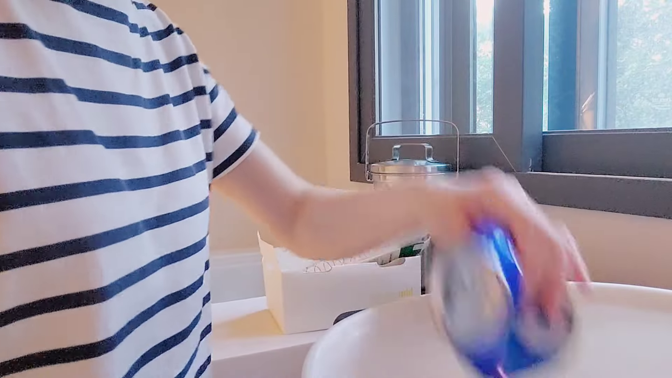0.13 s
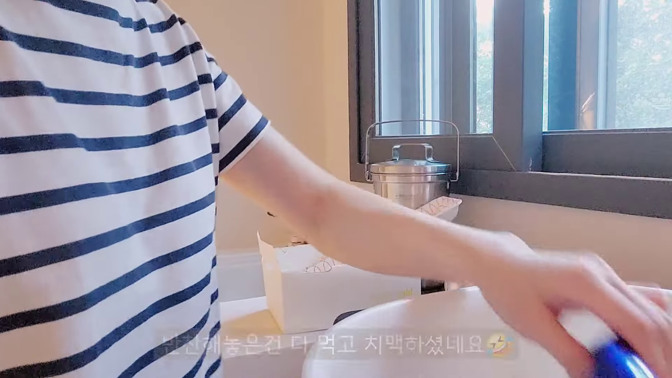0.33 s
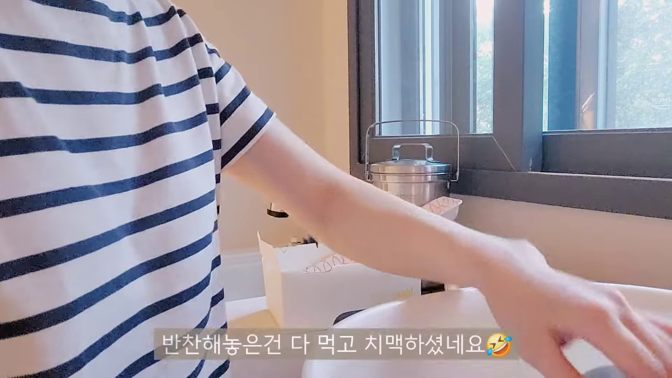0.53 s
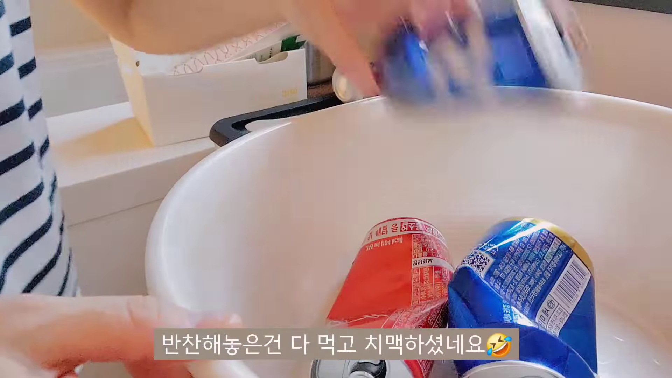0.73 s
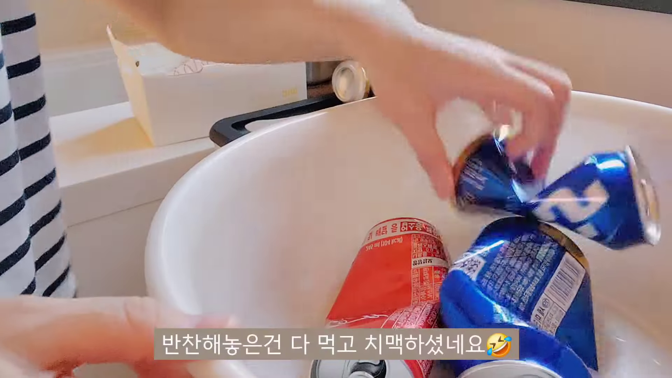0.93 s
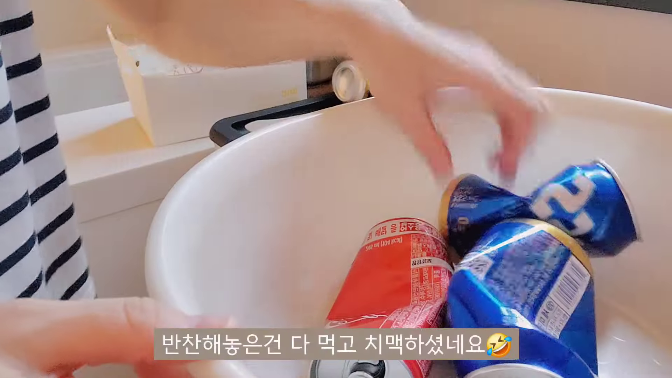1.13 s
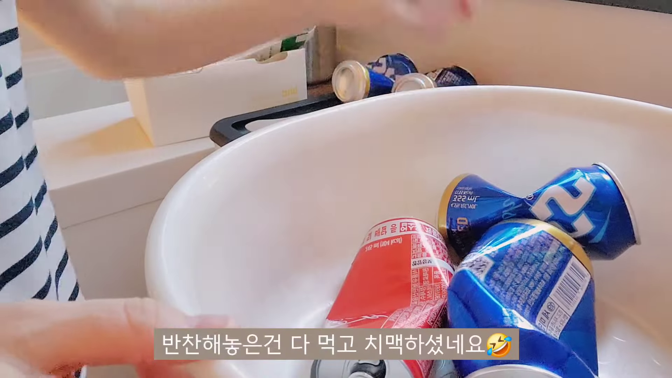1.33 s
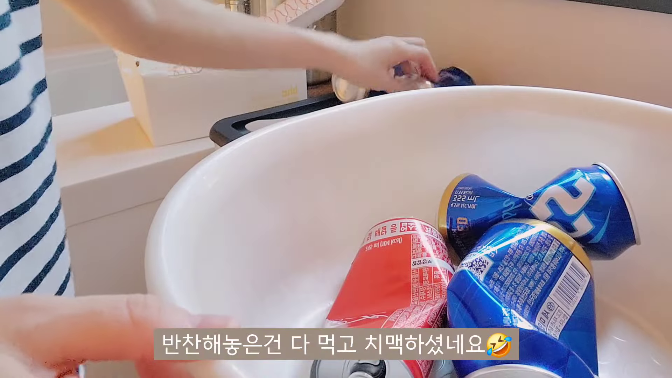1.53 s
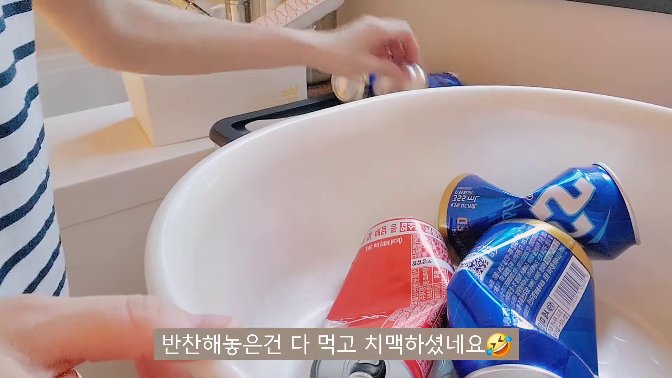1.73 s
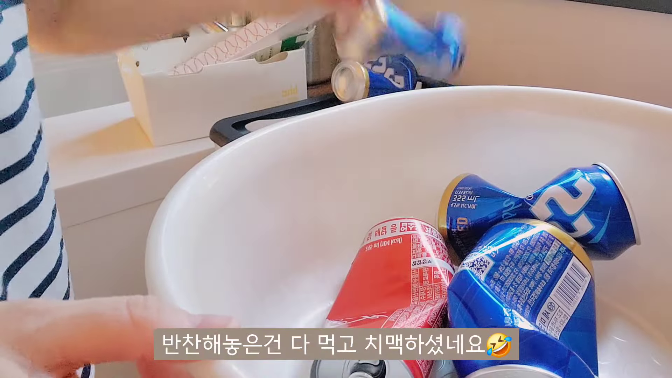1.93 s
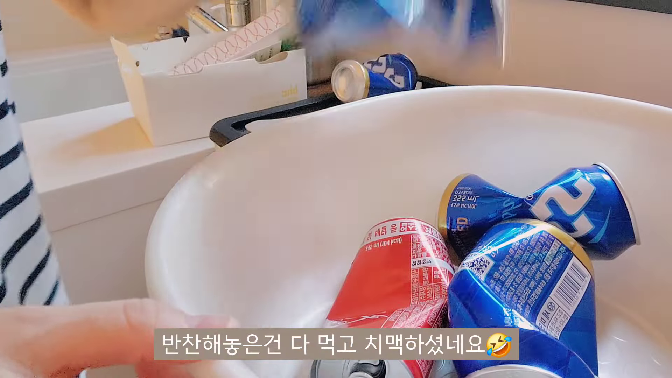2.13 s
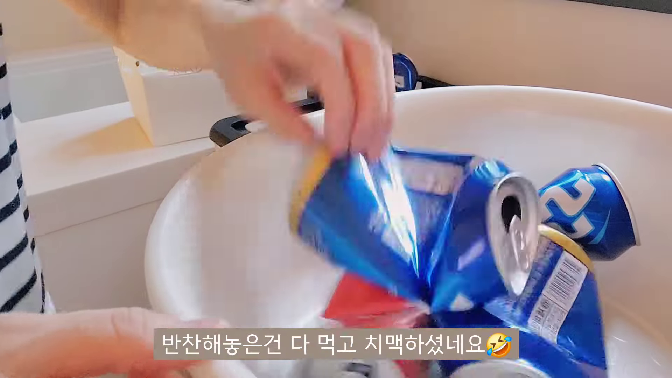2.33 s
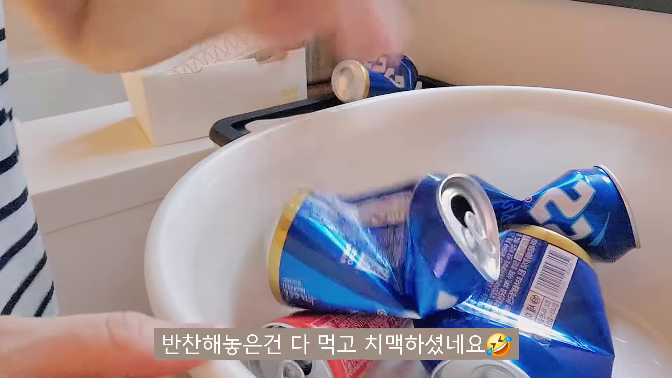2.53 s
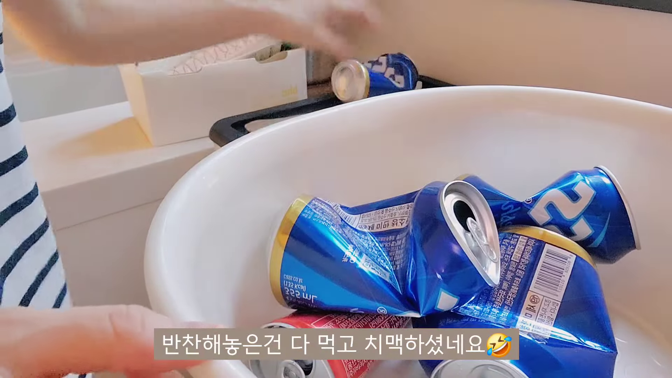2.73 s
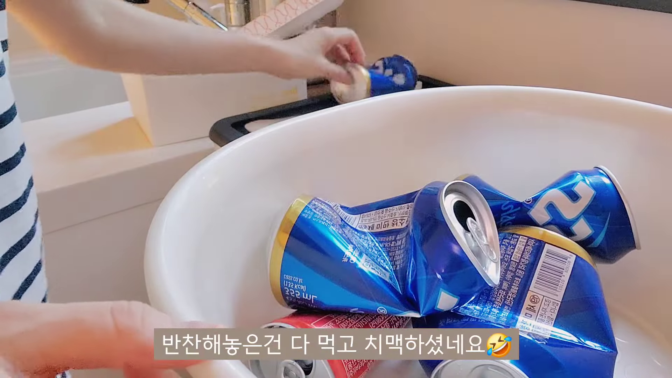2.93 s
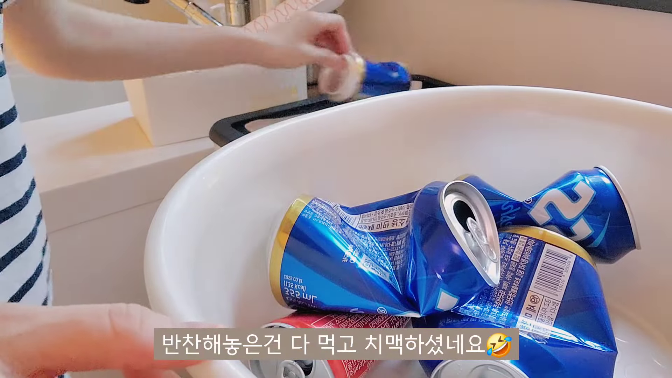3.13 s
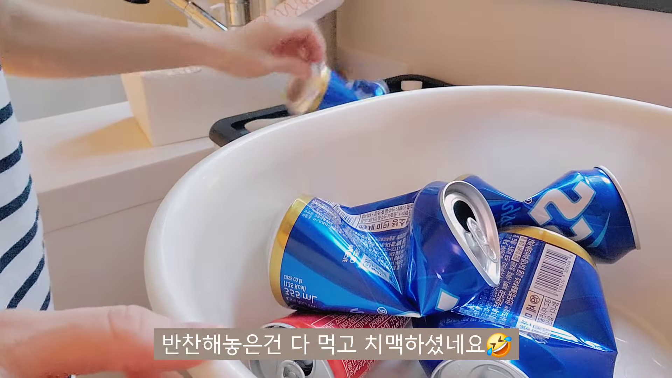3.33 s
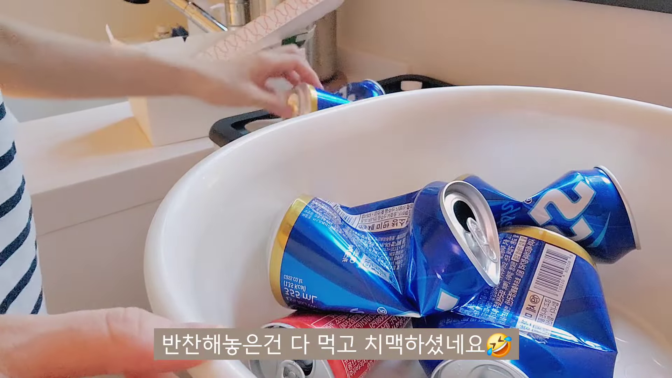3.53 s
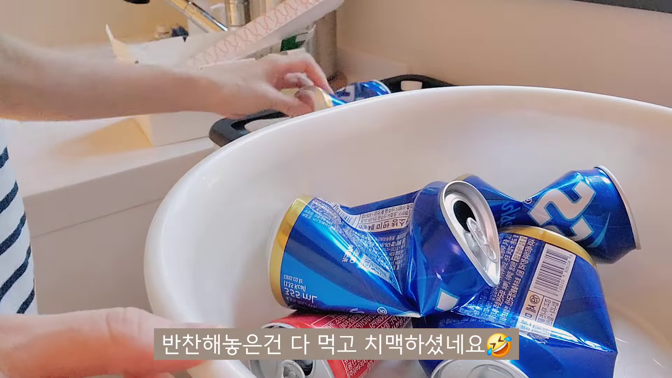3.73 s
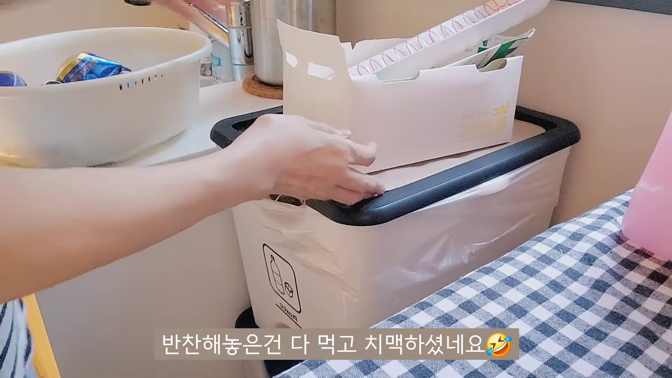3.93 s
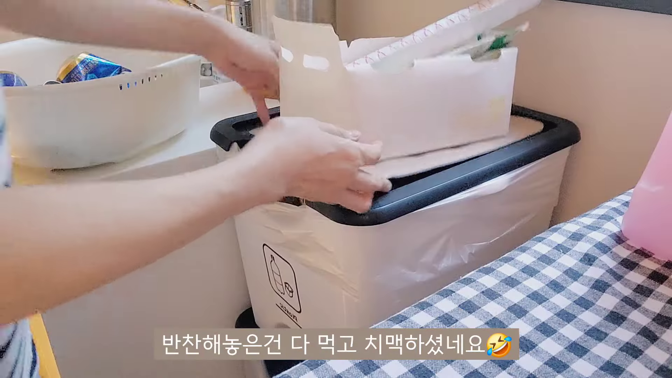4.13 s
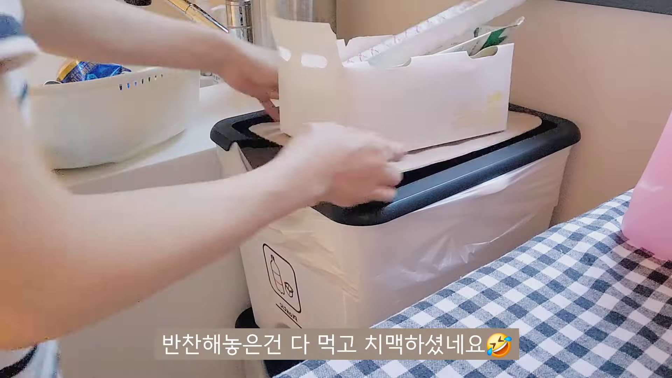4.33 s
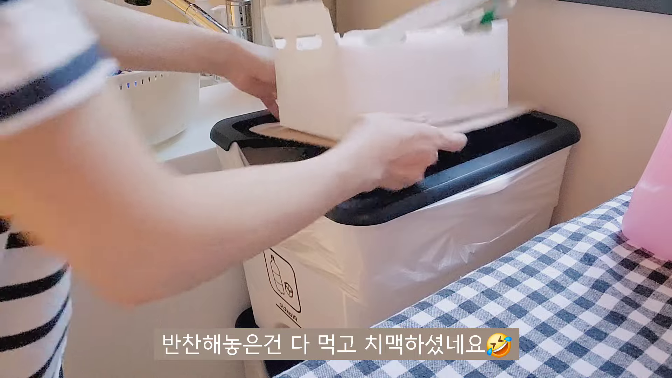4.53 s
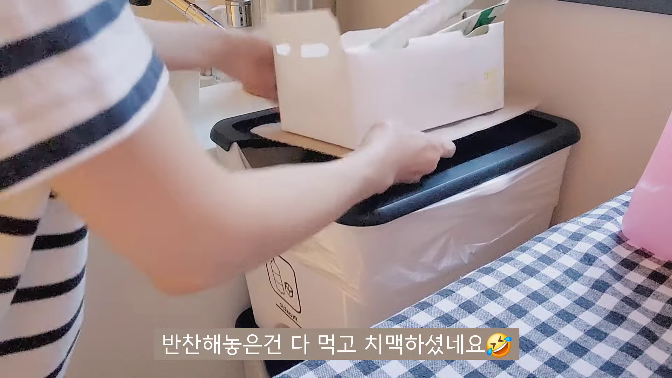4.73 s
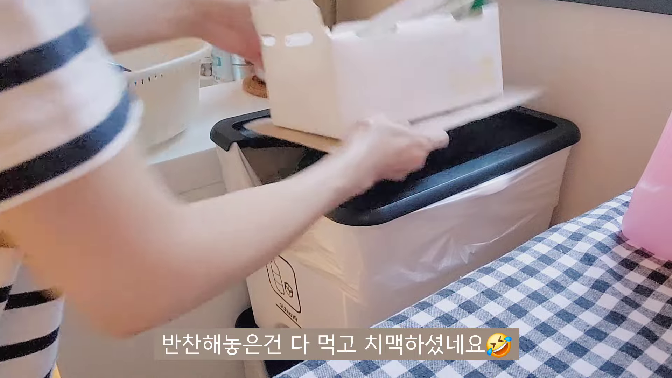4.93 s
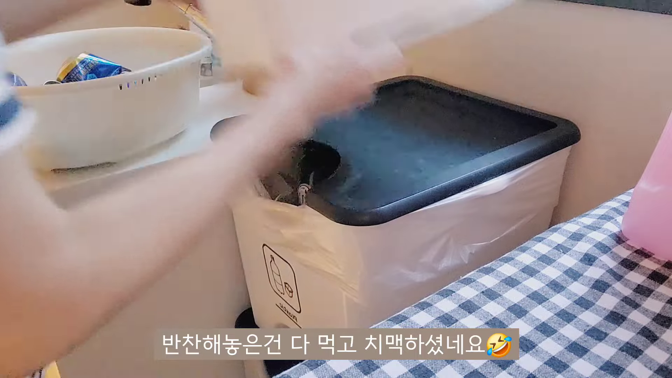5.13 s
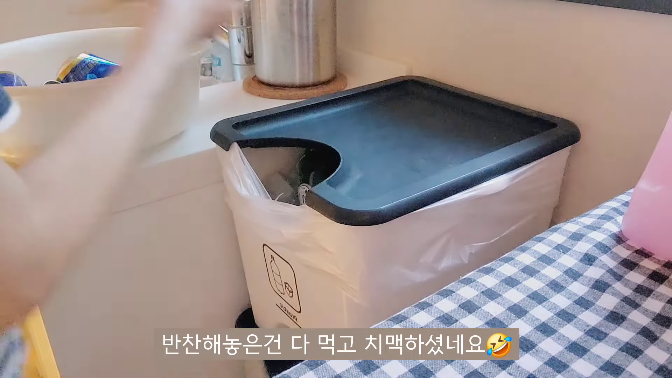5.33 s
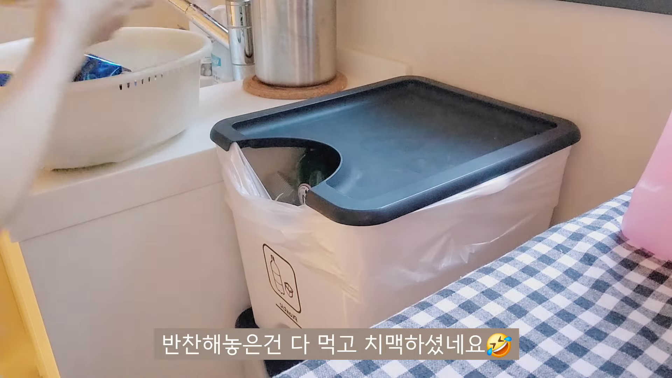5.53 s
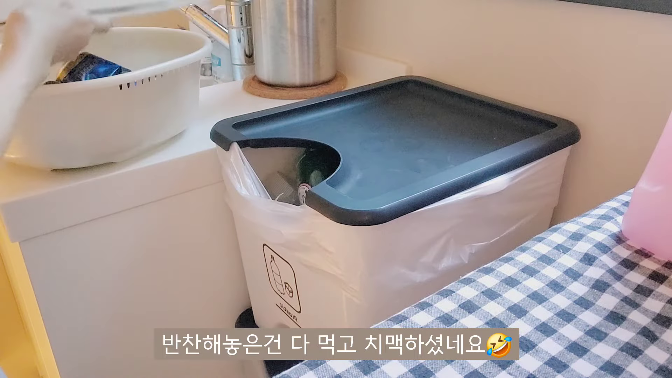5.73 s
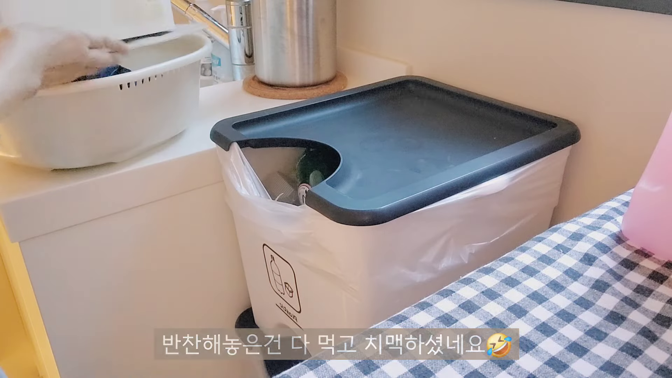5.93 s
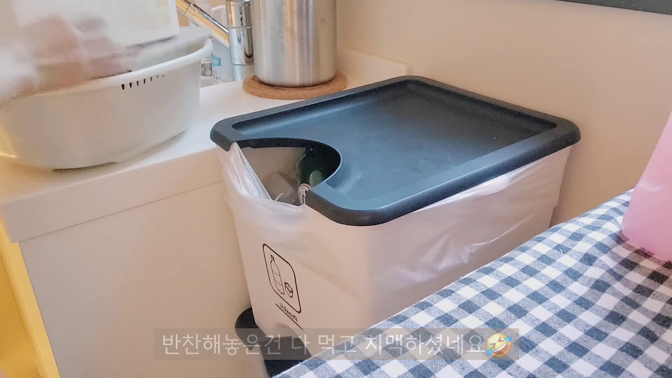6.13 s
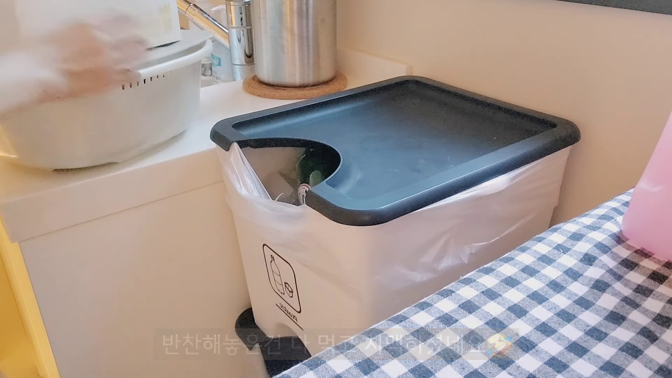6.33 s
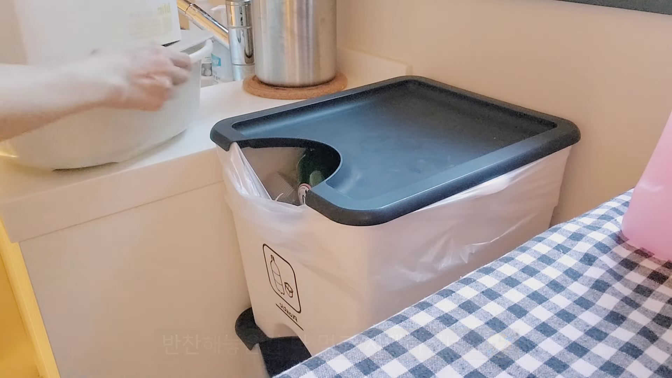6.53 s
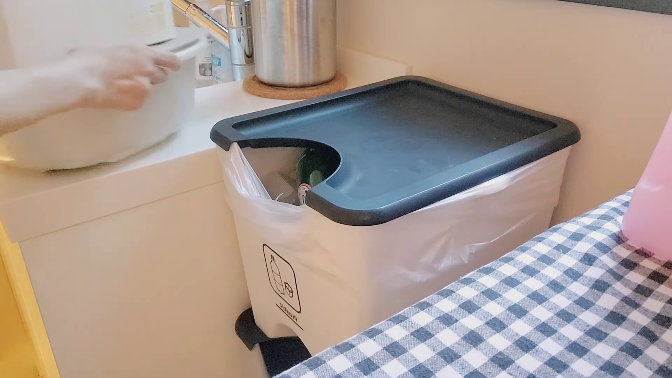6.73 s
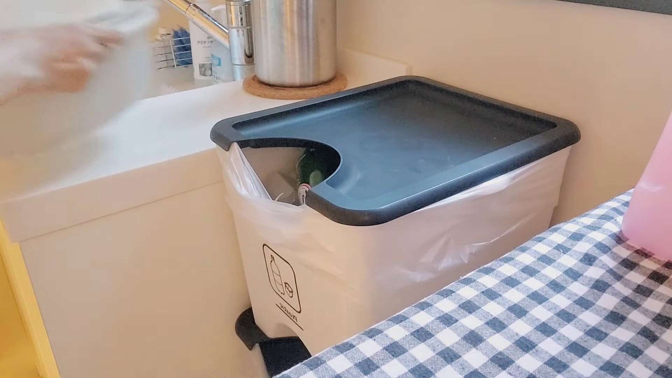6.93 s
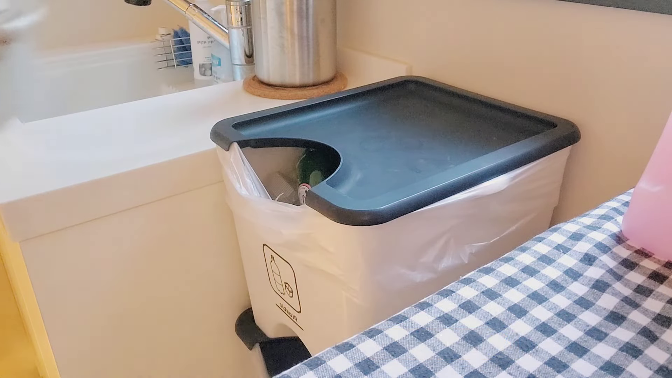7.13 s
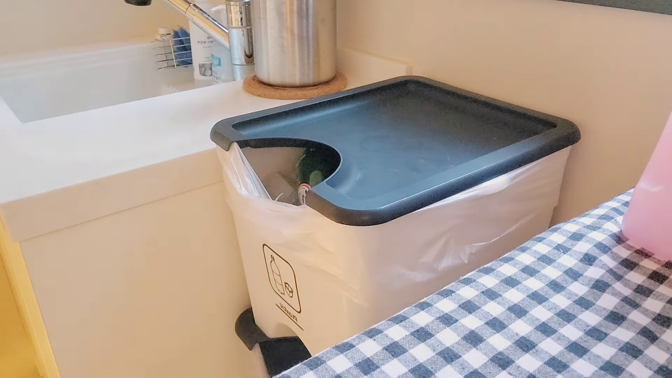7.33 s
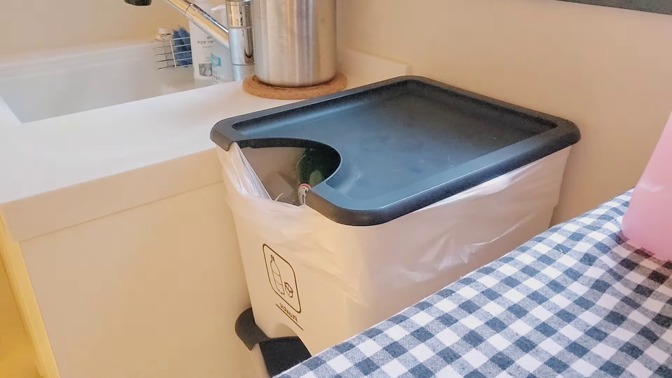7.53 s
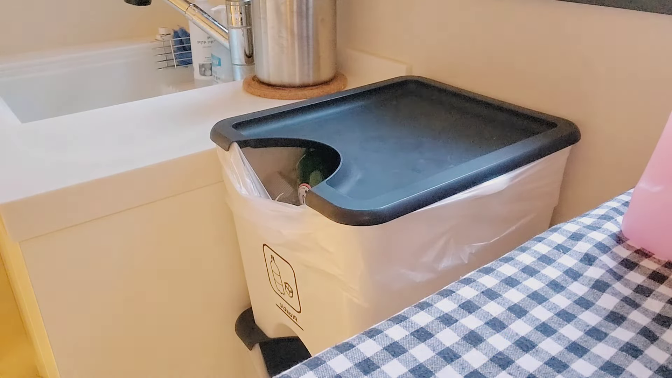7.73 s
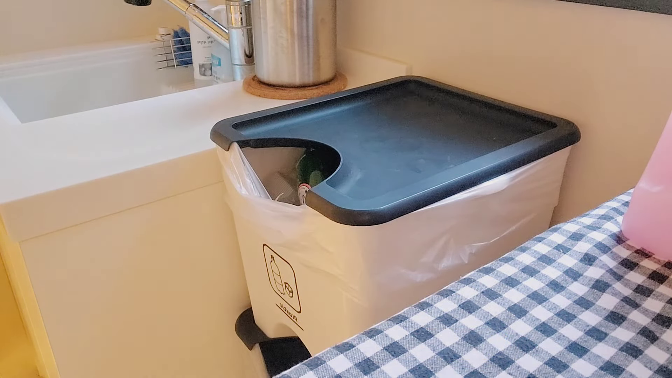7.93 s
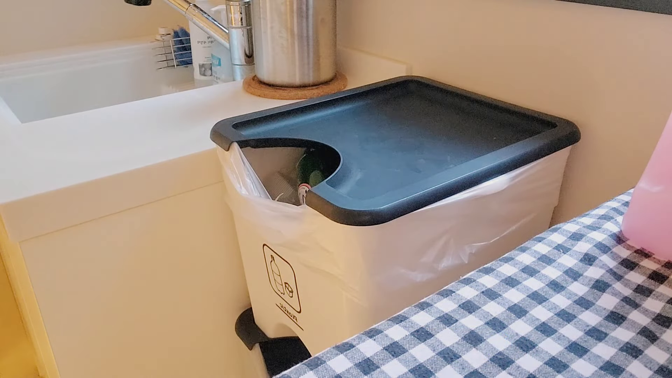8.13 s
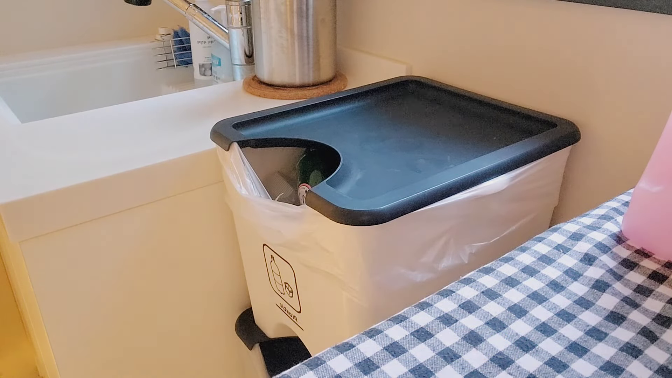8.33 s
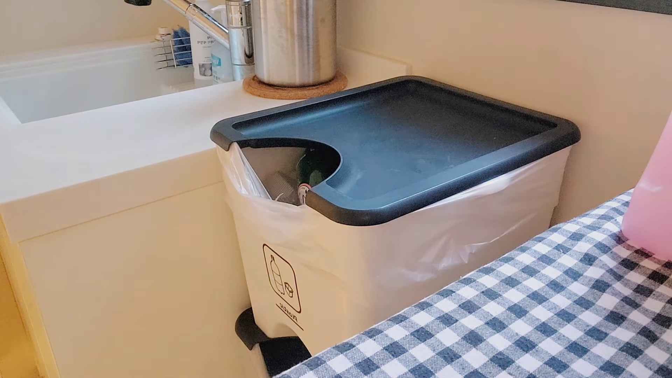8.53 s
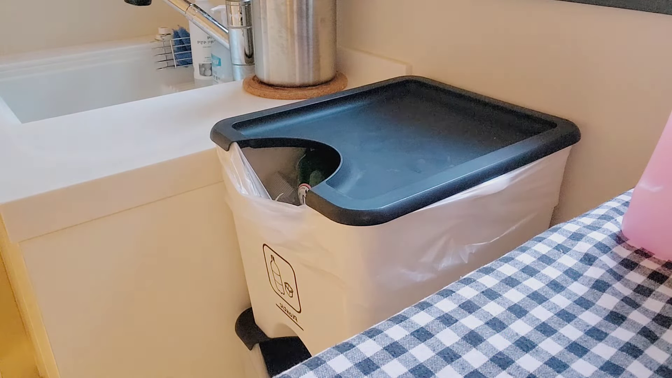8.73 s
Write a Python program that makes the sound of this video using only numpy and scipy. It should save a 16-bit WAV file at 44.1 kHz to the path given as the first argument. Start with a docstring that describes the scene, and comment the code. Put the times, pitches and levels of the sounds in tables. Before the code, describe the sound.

Quiet room air, a low appliance hum and a barely audible thin high whine run throughout a small kitchen, heard close in stereo with short reverberation. Around 0.3 s there is a faint slide and grate. At 0.55-0.77 s a crushed can clatters into a plastic basin, the sound breaking off abruptly. From 0.98 to 1.4 s more blows rattle and settle, loudest near 1.15 s, tinny and crackling over the hollow basin. Soft bin knocks and a hand rub follow at 1.6-1.7 s. The biggest crash comes at 2.4-2.7 s with several quick bounces. Dull bumps and faint rubs occupy 3.0-3.6 s; another can lands at 3.9 s. Cardboard rustles from 4.4 s, with a short snap and thumps near 4.8 s. Dull basin and bin knocks with gritty rim scrapes come at 5.9-6.7 s. Afterwards mostly hum, with tiny taps at 8.2 and 8.4 s.

```python
"""A low appliance hum and quiet room air come first, then a brief slide and grate and the first clatter.
Crushed drink cans land in a plastic basin in a small kitchen: decaying modes ring each can, coloured
noise clatters its shell, and three low modes boom in the basin. Soft knocks on a bin, cardboard tray
and basin, small pitched ticks, and rubs, rustles and resonant noises follow over the hum and a thin whine."""
import sys
import numpy as np
from scipy import signal
from scipy.fft import rfft, irfft, next_fast_len
from scipy.io import wavfile
from scipy.ndimage import uniform_filter1d

SR = 44100
rng = np.random.default_rng(int(sys.argv[2]) if len(sys.argv) > 2 else 0)


def wrap_up_sound(samples):
    """Save the sound to the file named by the first command line argument, as 16-bit audio."""
    columns = np.atleast_2d(samples).T
    # keep every value between -1 and 1, then stretch to whole-number steps
    tamed = np.clip(columns, -1, 1)
    steps = np.round(tamed * 32767).astype(np.int16)
    wavfile.write(sys.argv[1], SR, steps)


N = 391588
TIME = np.arange(N) / SR
RING_T = np.arange(SR * 6 // 10) / SR  # time axis of one blow [s]

# Blows as a can lands, rocks and settles:
# (time [s], level [dB], basin thud [dB], treble crack [dB], favoured pitch [Hz])
LANDINGS = [(0.545, -13.5, 5.5, 6, 1384), (0.659, -29, 6, 10.5, 437), (0.737, -12, -7.5, 0.5, 1300),
            (0.976, -14, 4.5, 10, 1260), (1.0, -14, 5, 2, 985), (1.125, -21, -12, 1, 1450),
            (1.153, -1, -12.5, -2.5, 1340), (1.177, -13.5, 1.5, -29, 780), (1.227, -10, -5, 1.5, 956),
            (1.248, -7.5, -3, -18, 770), (1.269, -16.5, -11, -17, 823), (1.287, -14, -7, -5.5, 1490),
            (1.388, -27.5, -7.5, -9, 1220), (2.411, -1.5, -8.5, 5.5, 890), (2.419, -1, -8.5, 1, 1340),
            (2.436, -8.5, -1.5, -12, 830), (2.55, -13.5, 6, 12, 443), (2.558, -9.5, -4.5, 1, 2220),
            (2.585, -5, -7, -1, 441), (2.597, -5, -1.5, 1.5, 1030), (2.62, -8, -8.5, 0.5, 726),
            (2.676, -10.5, 3.5, 5.5, 1020), (3.877, -9.5, -6.5, -4, 655), (3.909, -26.5, 10.5, 9, 1100),
            (4.064, -30.5, 2.5, 0, 910)]
# Strongest modes of each can, in turn: (frequency [Hz], level [dB])
CAN_MODES = [
    [(333, 7), (1313, -2), (1483, -3), (1571, 3.5), (2045, -5), (2901, 2.5), (5437, -5)],
    [(462, -0.5), (546, 5.5), (864, 0.5), (1289, -5.5), (1375, -6.5), (1706, -6), (2874, -3)],
    [(535, 3.5), (985, 3), (1270, -2.5), (1579, -2.5), (1779, 0.5), (4500, -5), (5459, 0)],
    [(648, -9), (712, -5.5), (754, -4.5), (797, 3), (880, -6), (1015, -3.5), (1210, -7), (1491, -11.5),
     (1922, -8), (2993, -13), (5250, -23), (5510, -12), (5940, -20)],
    [(441, -7.5), (636, -9), (726, -9.5), (780, -9), (862, -11), (1008, -7.5), (1350, -9.5), (1470, -13),
     (1750, -6.5), (2178, -17.5), (2610, -14.5), (3607, -19)],
    [(648, 1), (917, -9), (1106, -3), (1453, -1.5), (1693, -14)],
]
# How each can falls, in turn:
# (ring t60 at 1 kHz [s], clatter level [dB], clatter t60 [s], contact with the basin [dB])
FALLS = [(0.097, -0.5, 0.13, -15), (0.14, -1.5, 0.51, 0.5), (0.089, -2.5, 0.13, -2.5),
         (0.15, -0.5, 0.18, 1), (0.18, -1.5, 0.16, -4), (0.21, -0.5, 0.37, -15)]
# Moments when the next can takes over: (time [s])
NEXT_CAN_S = [.6, .9, 1.1, 2, 3.5]
# Modes of the plastic basin: (frequency [Hz], level [dB], t60 [s])
BASIN_MODES = [(270.6, -1.5, 0.43), (310, -9.5, 0.31), (388, -2, 0.094)]
# Colour of a rattling shell: (frequency [Hz], power density [dB])
CLATTER_COLOUR = [(29, -43), (50, 1.5), (165, -8), (235, -12.5), (275, 4.5), (337, -11), (439, -6.5),
                  (586, -9), (783, -5.5), (1330, -11), (2750, -20), (5530, -27), (8140, -34),
                  (14500, -36.5), (16000, -46)]

# Dull knocks: (time [s], level [dB], treble tick [dB], what is knocked)
KNOCKS = [(1.603, -33, -3, "bin"), (1.611, -31.5, 3.5, "bin"), (3.045, -23, -0.5, "basin"),
          (3.068, -35, -18, "basin"), (3.442, -21, 0, "bin"), (3.583, -24.5, -5, "bin"),
          (4.397, -37, 17.5, "tray"), (4.765, -29.5, 15.5, "tray"), (4.834, -17.5, 0.5, "tray"),
          (4.877, -20, -1.5, "tray"), (5.92, -17, -6.5, "basin"), (5.964, -31.5, 2, "basin"),
          (6.277, -25.5, -2, "bin"), (6.298, -25.5, -1.5, "basin"), (6.655, -23, -6, "basin"),
          (8.157, -29, -5, "tray"), (8.445, -41.5, 16.5, "tray")]
# Answer of each knocked thing: (basin note [dB], deep thump [dB], t60 [s], first crack [signed gain])
KNOCKED_BODIES = {"bin": (-31, 11.5, 0.2452, 1), "tray": (-56, 1.5, 0.1162, -0.5),
                  "basin": (-7, -2, 0.3549, -1)}
# Colour of a soft knock: (frequency [Hz], power density [dB])
KNOCK_COLOUR = [(35, 2), (60, 1.5), (256, -0.5), (500, -7.5), (1040, -7.5), (1280, -12.5), (1510, -5.5),
                (1910, -14), (5330, -21), (6740, -29.5), (16000, -41.5)]
# Small pitched ticks, light touches that ring and one short snap of cardboard:
# (time [s], level [dB], pitch [Hz], ring t60 [s])
TICKS = [(3.071, -39.5, 2230, 0.14), (3.071, -30, 713, 0.099), (3.443, -34, 1004, 0.11),
         (4.764, -15.5, 2040, 0.01)]

# Short resonant noises, drags that sing and one brief hollow thump of the tray:
# (time [s], length [s], level [dB], resonance [Hz], resonance width [Hz])
RESONANT_NOISES = [(0.658, 0.16, -34, 480, 130), (1.677, 0.09, -45, 1012, 89),
                   (3.214, 0.28, -49.5, 730, 70), (4.874, 0.021, -32, 440, 120)]
# Hands, sleeves, cardboard and rims sliding:
# (middle time [s], half length [s], level [dB], what slides)
STROKES = [(0.277, 0.1, -53, "card"), (0.32, 0.031, -41, "rim"), (1.73, 0.14, -41.5, "hand"),
           (2.979, 0.043, -44.5, "hand"), (3.169, 0.19, -47, "hand"), (4.214, 0.023, -48, "hand"),
           (4.43, 0.16, -45, "card"), (4.748, 0.013, -45.5, "rim"), (4.804, 0.14, -40, "card"),
           (5.193, 0.017, -50.5, "cloth"), (5.969, 0.025, -37.5, "rim"), (6.01, 0.14, -54, "cloth"),
           (6.305, 0.046, -45.5, "rim"), (6.306, 0.086, -48.5, "cloth"), (7.733, 0.044, -55.5, "cloth")]
# What each sliding material gives: (dull rub [dB], dry rustle [dB], gritty grating [dB])
MATERIALS = {"hand": (0, -18, -13), "card": (0, -5.5, -11), "cloth": (-7, 0, -43), "rim": (3, -19.5, 0)}
# Colours of rubbing, rustling and a grating rim: (frequency [Hz], power density [dB])
RUB_COLOUR = [(50, -24), (110, -4), (175, -2.5), (330, -11), (800, -17), (5000, -43)]
RUSTLE_COLOUR = [(200, 8), (1000, -4.5), (2600, -8), (3100, 9), (4200, 2.5), (5500, 6), (6800, -8),
                 (10000, -3.5), (15500, -6)]
GRIT_COLOUR = [(200, -37), (650, 0.5), (1650, 0.5), (7000, -31.5)]

# Colour of the room air: (frequency [Hz], power density [dB])
AIR_COLOUR = [(20, -8), (60, 0), (113, -5), (163, -15), (204, -12.5), (347, -14), (459, -13), (1030, -12.5),
              (1150, -14.5), (2260, -16.5), (2670, -21.5), (5000, -24.5), (6600, -29.5), (7400, -27.5),
              (8300, -32), (9500, -27), (11200, -35.5), (16000, -38.5)]
# Wavering bands of the appliance hum: (frequency [Hz], level [dB], width [Hz])
HUM_BANDS = [(53.3, -59.5, 6.8), (152.5, -60.5, 9.3), (271.1, -65.5, 9.1), (351, -61, 42),
             (2220, -64.5, 330)]
# Loudness path of the thin whine: (time [s], level [dB])
WHINE_LEVEL = [(0, -80), (2.1, -67), (3.8, -77), (8.9, -78)]
# Left-right likeness of close sounds and of the room: (frequency [Hz], correlation [-1..1])
NEAR_LIKENESS = [(100, 0.99), (300, 1), (700, 0.78), (1400, 0.27), (2800, 0.03), (8000, 0.11)]
DIFFUSE_LIKENESS = [(60, 0.96), (130, 0.92), (290, 0.92), (640, 0.31), (1300, 0.038), (8000, 0.0081)]
# Reverberation of the kitchen: (frequency [Hz], t60 [s])
ROOM_T60 = [(100, 0.14), (1000, 0.26), (14000, 0.11)]

BREAK_S = .769  # the first clatter stops abruptly here
METAL_DB, SHELL_DB, BOOM_DB = -12.5, -6.5, -9.5  # the can's ring, its clatter and the basin's note
FOCUS_DB, FOCUS_OCTAVES = 12.5, 0.13  # how strongly and narrowly a blow favours one pitch
MODE_SHIFT = .006  # typical shift of a can's modes with each new support (share)
FACET_HZ, FACET_OCTAVES = 901.4, 2.6  # lowest pitch of a dent, and the range above it
FACET_DB, FACET_T60 = -11, 0.055  # loudest average level of a dent, and its decay in seconds
FACET_SPREAD_S = 0.032  # latest start of a dent after its blow
TICK_PAIR, TICK_PAIR_DB = 1.035, -4.5  # the upper mode's pitch ratio and level
SLIP_DB = 5  # unevenness as a sliding thing catches and slips
SNAPS_PER_S, SNAP_DB = 70, 23  # fibres snapping free: how often, and how far above the rustle
AIR_DB = -49.5
MOTOR_HZ, MOTOR_DB = 49.9, -53  # steady turning of the appliance's motor
WHINE_HZ, WHINE_OCTAVE_DB = 3623, -6  # pitch, and level of the second partial
EDGE_HZ = 16000  # upper band limit


def amp(db):
    """Decibels to gain."""
    return 10 ** (np.asarray(db) / 20)


def unit(x):
    """Scales to rms 1."""
    return x / np.sqrt(np.mean(x ** 2) + 1e-20)


def read(points, hz):
    """Reads a table along a log-frequency axis."""
    f, value = np.transpose(points)
    return np.interp(np.log(hz + 1), np.log(f + 1), value)


def bins(size):
    """Frequencies of a spectrum of that many samples."""
    return np.fft.rfftfreq(size, 1 / SR)


def shelf(hz, corner_hz):
    """Rises from 0 well below the corner to 1 well above it."""
    return hz ** 4 / (hz ** 4 + corner_hz ** 4)


def add(mix, s, sound):
    """Mixes a stereo sound in at time s."""
    part = mix[:, max(round(s * SR), 0):][:, :sound.shape[1]]
    part += sound[:, :part.shape[1]]


def pair(x, likeness):
    """Blends two unrelated channels until they are as alike as the table says."""
    same = np.clip(read(likeness, bins(x.shape[1])), -1, 1)
    a, b = rfft(x)
    mid = a * np.sqrt((1 + same) / 2)
    side = b * np.sqrt((1 - same) / 2)
    return irfft(np.array([mid + side, mid - side]), x.shape[1])


def colour(x, db):
    """Minimum-phase filter with the given gain in each bin, so that blows keep their sharp start."""
    cepstrum = irfft(np.maximum(db, -100) * np.log(10) / 20, x.shape[1])
    cepstrum[1:] *= 2
    cepstrum[x.shape[1] // 2:] = 0  # fold the response forward in time
    return irfft(rfft(x) * np.exp(rfft(cepstrum)), x.shape[1])


def stream(spectrum, likeness, grain=1):
    """Stereo noise of a given colour at rms 1; grain makes it crackle."""
    size = next_fast_len(N, True)
    white = rng.standard_normal((2, N)) * grain
    white = np.pad(white, ((0, 0), (0, size - N)))
    gain = amp(read(spectrum, bins(size)))
    return unit(irfft(rfft(pair(white, likeness)) * gain, size)[:, :N])


def cans():
    """Each blow rings the falling can and rattles the heap; two tracks: before and after the break."""
    tracks = np.zeros((2, 2, N))
    combs = [.55 * dents(spacing_hz=130, width_hz=30, count=60) for _ in CAN_MODES]
    for s, level_db, thud_db, crack_db, centre_hz in LANDINGS:
        can = np.searchsorted(NEXT_CAN_S, s)
        ring_t60, clatter_db, clatter_t60, contact_db = FALLS[can]
        modes = []
        for hz, db in CAN_MODES[can]:
            t60 = ring_t60 * (1000 / hz) ** 0.23  # higher modes die sooner
            modes.append((hz * rng.normal(1, MODE_SHIFT), db, t60))
        metal = amp(METAL_DB) * ring(modes, scatter_db=3.5, centre_hz=centre_hz, focus_db=FOCUS_DB)
        shell = clack(thud_db, crack_db, clatter_db, contact_db, clatter_t60, combs[can])
        add(tracks[int(s > BREAK_S)], s, amp(level_db) * (metal + shell + facets()))
    return tracks


def ring(modes, scatter_db, centre_hz=1, focus_db=0):
    """Decaying modes; the spot that is struck favours those near one pitch."""
    hz, db, t60 = np.transpose(modes)[:, :, None]
    size, spread = rng.standard_normal((2, len(hz), 1))
    focus = focus_db / (1 + (np.log2(hz / centre_hz) / FOCUS_OCTAVES) ** 2)
    level_db = db + scatter_db * size + focus
    # the less alike the two sides, the further a mode is out of step between them
    lag = np.sign(spread) * np.arccos(np.clip(read(NEAR_LIKENESS, hz), -1, 1)) / 2
    fade = amp(level_db - 60 * RING_T / t60)
    fade = fade * (-1) ** np.arange(len(hz))[:, None]  # neighbouring modes have opposite signs
    turn = 2 * np.pi * hz * RING_T
    return np.array([(fade * np.sin(turn + side * lag)).sum(0) for side in (-1, 1)])


def clack(thud_db, crack_db, clatter_db, contact_db, t60, comb_db):
    """A crumpled shell clatters as noise and sets the basin's modes booming."""
    hz = bins(len(RING_T))
    tone_db = thud_db * (1 - shelf(hz, 510)) + crack_db * shelf(hz, 2170)
    shell = burst(CLATTER_COLOUR, tone_db + comb_db, t60, crack=1.68, crack_s=0.0025, rise_s=0.0012)
    note = ring(BASIN_MODES, scatter_db=1)
    return amp(SHELL_DB + clatter_db) * shell + amp(BOOM_DB + contact_db + thud_db) * note


def burst(spectrum, change_db, t60, crack, crack_s, rise_s):
    """A contact followed by a dying chatter: noise with an uneven, fading level."""
    decay = amp(-60 * (RING_T / max(t60, .02)) ** 1.15)
    shape = decay + crack * np.exp(-RING_T / crack_s)
    wander = unit(uniform_filter1d(rng.standard_normal(len(RING_T)), size=90))
    chatter = unit(amp(3 * np.clip(wander, -2, 2)))
    shape = shape * chatter * (1 - np.exp(-RING_T / rise_s))
    db = read(spectrum, bins(len(RING_T)))
    db = db - 10 * np.log10(np.mean(amp(db) ** 2))  # colour at unit power
    db = db - 14 * (1 - shelf(bins(len(RING_T)), 74))  # light things radiate little deep bass
    noise = rng.standard_normal((2, len(RING_T))) * shape
    return colour(pair(noise, NEAR_LIKENESS), db + change_db)


def dents(spacing_hz, width_hz, count):
    """Uneven comb of resonances, in dB; absent in the bass and slightly softened in the treble."""
    hz = bins(len(RING_T))
    gaps, size = rng.uniform(-1.034, 1, (2, count))
    steps_hz = (1 + .6 * gaps) * spacing_hz * np.linspace(1, 3, count)  # wider apart higher up
    peaks_hz = 850 + np.cumsum(steps_hz)
    width = width_hz * np.sqrt(peaks_hz / 1000)
    peaks = amp(4.5 * size) ** 2 / (1 + (2 * (hz[:, None] - peaks_hz) / width) ** 4)
    power = .04 + peaks.sum(1)
    depth = shelf(hz, 1000) * (1 - .1 * shelf(hz, 3500))
    return 10 * np.log10(power / uniform_filter1d(power, size=800)) * depth


def facets(count=7):
    """Just after a blow, dents in the crumpled wall tick against the heap, each with its own pitch."""
    out = np.zeros((2, len(RING_T)))
    for wait, pitch in rng.random((count, 2)):
        hz = FACET_HZ * 2 ** (FACET_OCTAVES * pitch)
        level_db = FACET_DB - 6 * (wait + pitch)  # later and higher dents are softer
        add(out, FACET_SPREAD_S * wait, ring([(hz, level_db, FACET_T60)], scatter_db=0.5))
    return out


def knocks():
    """Soft blows on plastic and card: a thump, a tick and a little of the basin's note."""
    out, hz = np.zeros((2, N)), bins(len(RING_T))
    for s, level_db, tick_db, thing in KNOCKS:
        note_db, thump_db, t60, crack = KNOCKED_BODIES[thing]
        tone_db = tick_db * shelf(hz, 1100) + thump_db * (1 - shelf(hz, 246))
        tone_db = tone_db + 4 / (1 + ((hz - 430) / 90) ** 2)  # a hollow tone in every knock
        tone_db = tone_db + .55 * dents(spacing_hz=200, width_hz=60, count=40)
        body = amp(-9.5) * burst(KNOCK_COLOUR, tone_db, t60, crack, crack_s=0.002, rise_s=0.00053)
        note = ring(BASIN_MODES, scatter_db=1)
        add(out, s, amp(level_db) * (body + amp(note_db) * note))
    return out


def ticks():
    """Small pitched ticks, each one close pair of modes: light touches ring, a cardboard snap is short."""
    out = np.zeros((2, N))
    for s, level_db, hz, t60 in TICKS:
        modes = [(hz, 0, t60), (hz * TICK_PAIR, TICK_PAIR_DB, t60)]
        add(out, s, amp(level_db) * ring(modes, scatter_db=5.5))
    return out


def resonant_noises():
    """Noise through one resonance: long ones are drags that sing, the briefest a hollow thump of the tray."""
    out = np.zeros((2, N))
    for s, length_s, level_db, hz, width_hz in RESONANT_NOISES:
        noise = rfft(pair(rng.standard_normal((2, len(RING_T))), NEAR_LIKENESS))
        resonance = 1 / (1 + (2 * (bins(len(RING_T)) - hz) / width_hz) ** 2)
        tone = unit(irfft(noise * resonance, len(RING_T)))
        swell = np.sqrt(abs(np.sin(np.pi * np.minimum(RING_T / length_s, 1))))
        if s < BREAK_S:  # stops with the first clatter
            swell = swell * (s + RING_T < BREAK_S)
        add(out, s, amp(level_db) * swell * tone)
    return out


def handling():
    """Sliding things rub dully, rustle with tiny snaps and grate in uneven slips."""
    swells = np.zeros((3, N))
    for s, half_s, level_db, material in STROKES:
        swell = np.exp(-((TIME - s) / half_s) ** 2)
        swells += amp(level_db) * np.outer(amp(MATERIALS[material]), swell)
    rub, rustle, grit = swells
    snaps = amp(SNAP_DB * (rng.random(N) < SNAPS_PER_S / SR))
    wander = unit(uniform_filter1d(rng.standard_normal(N), size=200))
    slips = amp(SLIP_DB * np.clip(wander, -2, 2))
    rubbing = rub * stream(RUB_COLOUR, NEAR_LIKENESS)
    rustling = rustle * stream(RUSTLE_COLOUR, DIFFUSE_LIKENESS, np.sqrt(slips) * snaps)
    grating = grit * stream(GRIT_COLOUR, NEAR_LIKENESS, slips)
    return rubbing + rustling + grating


def kitchen(x, wet_db, build_s):
    """Adds the short reverberation of hard, close walls: noise that decays by frequency."""
    noise = pair(rng.standard_normal((2, len(RING_T))), DIFFUSE_LIKENESS)
    hz, t, z = signal.stft(noise, SR, nperseg=256)
    decay = amp(-60 * t / read(ROOM_T60, hz)[:, None])
    tail = signal.istft(z * decay, SR, nperseg=256)[1][:, :len(RING_T)]
    tail = tail * (1 - np.exp(-RING_T / build_s))
    wet = signal.fftconvolve(x, tail / np.linalg.norm(tail[0]), axes=1)[:, :N]
    return x + amp(wet_db) * wet


def background():
    """Noise as room air, narrow noise bands as wavering hum, and sines as motor and electrical whine."""
    size = next_fast_len(N, True)
    bands = np.zeros(size // 2 + 1)
    for hz, db, width in HUM_BANDS:
        bands += amp(db) * unit(1 / (1 + (2 * (bins(size) - hz) / width) ** 2))
    noise = pair(rng.standard_normal((2, size)), DIFFUSE_LIKENESS)
    hum = irfft(rfft(noise) * bands, size)[:, :N]
    turn = 2 * np.pi * WHINE_HZ * TIME
    whine = unit(np.sin(turn) + amp(WHINE_OCTAVE_DB) * np.sin(2 * turn))
    whine = amp(np.interp(TIME, *np.transpose(WHINE_LEVEL))) * whine
    motor = amp(MOTOR_DB) * unit(np.sin(2 * np.pi * MOTOR_HZ * TIME))
    air = amp(AIR_DB) * stream(AIR_COLOUR, DIFFUSE_LIKENESS)
    return air + motor + hum + whine


def scene():
    """The first clatter breaks off abruptly; later blows ring out in the room."""
    first, later = cans()
    opening = kitchen(first, wet_db=-13.0, build_s=0.0049) * (TIME < BREAK_S)
    work = kitchen(later + knocks() + ticks(), wet_db=-10.0, build_s=0.0027)
    return opening + work + handling() + resonant_noises() + background()


def record(dry):
    """The left side is a little brighter; peaks overload softly; then the band limit."""
    # left-right balance: (frequency [Hz], left minus right [dB])
    lean_db = [(600, 0.2), (1400, -0.4), (2800, 2.5), (5500, -0.6), (9500, 3.5), (14000, 2.5)]
    size = next_fast_len(N, True)
    lean = amp(np.outer([1, -1], read(lean_db, bins(size))) / 2)
    heard = irfft(rfft(dry, size) * lean, size)[:, :N]
    limited = 1.3 * np.tanh(heard / 1.3)
    low_pass = signal.firwin(255, EDGE_HZ, window=("kaiser", 8), fs=SR)
    return signal.oaconvolve(limited, low_pass[None], "same")


dry = scene()
out = record(dry)
wrap_up_sound(out)
```